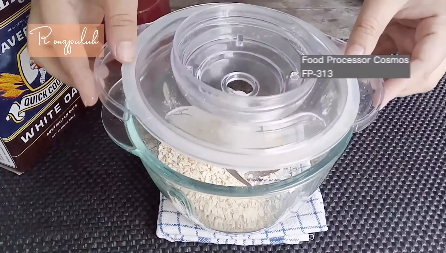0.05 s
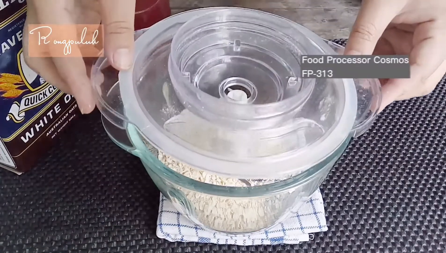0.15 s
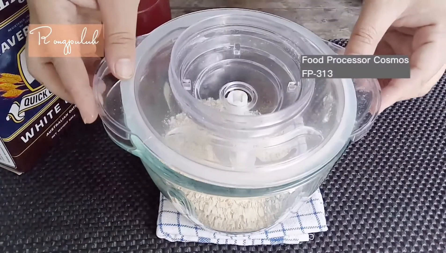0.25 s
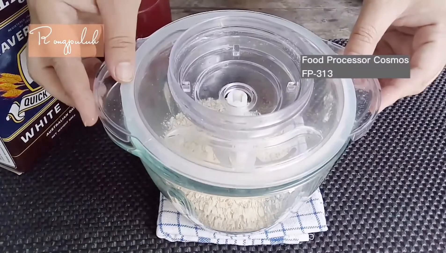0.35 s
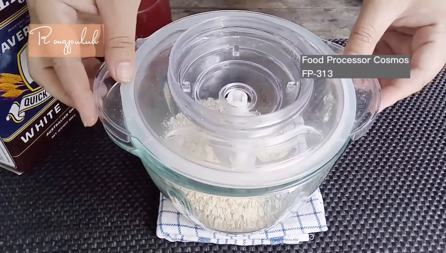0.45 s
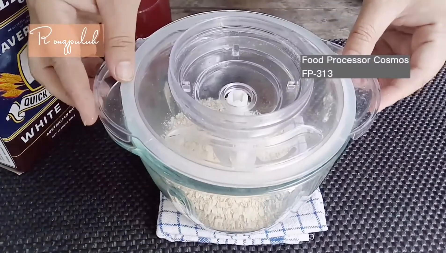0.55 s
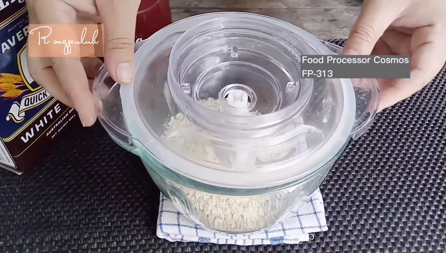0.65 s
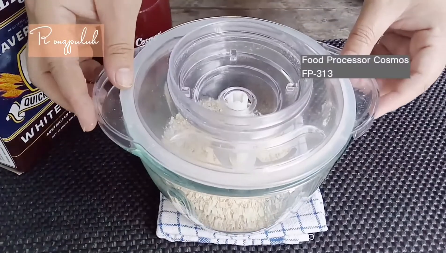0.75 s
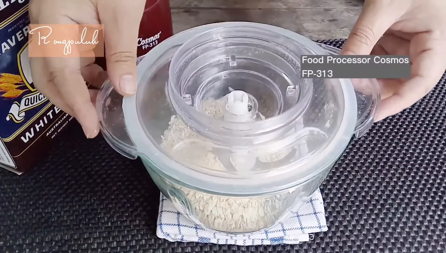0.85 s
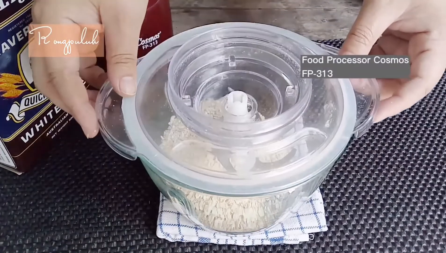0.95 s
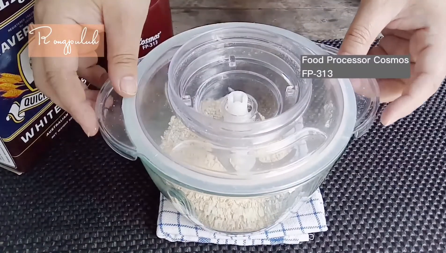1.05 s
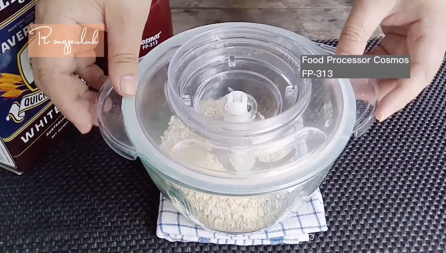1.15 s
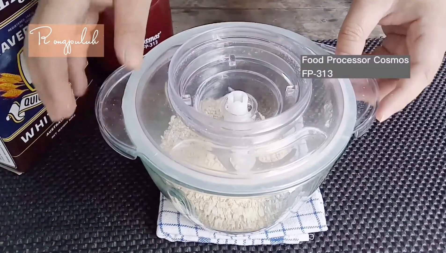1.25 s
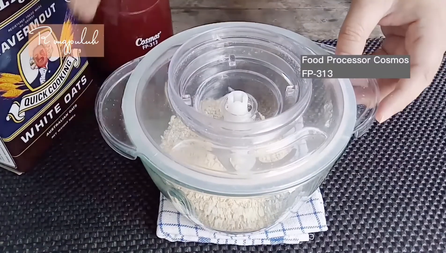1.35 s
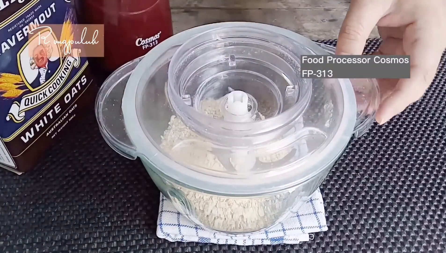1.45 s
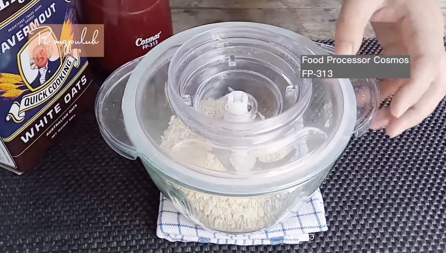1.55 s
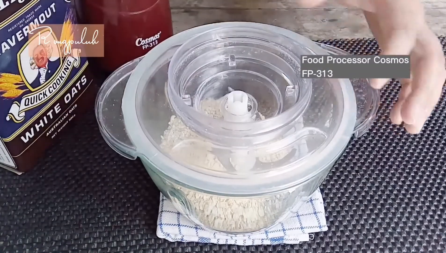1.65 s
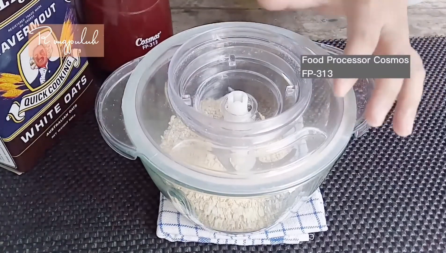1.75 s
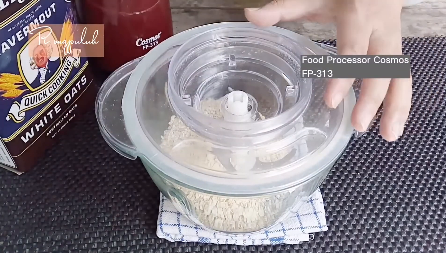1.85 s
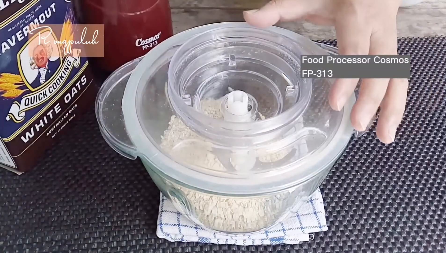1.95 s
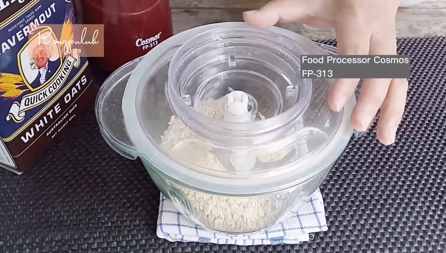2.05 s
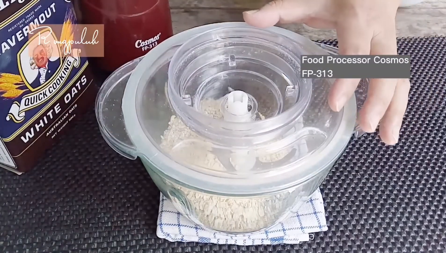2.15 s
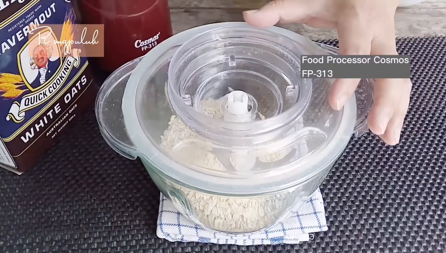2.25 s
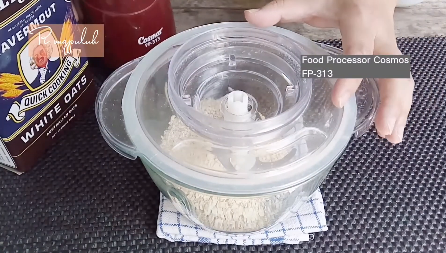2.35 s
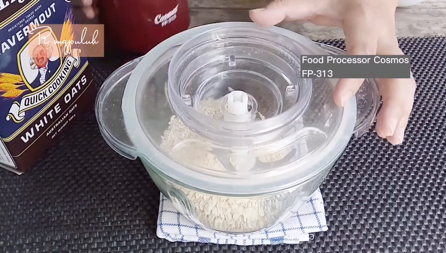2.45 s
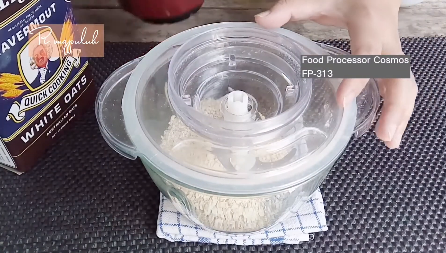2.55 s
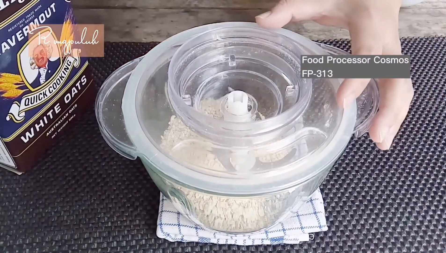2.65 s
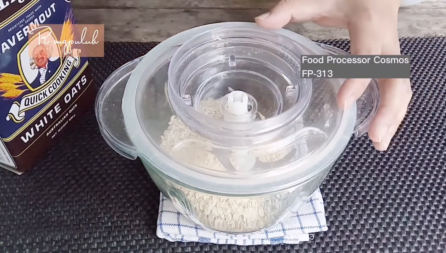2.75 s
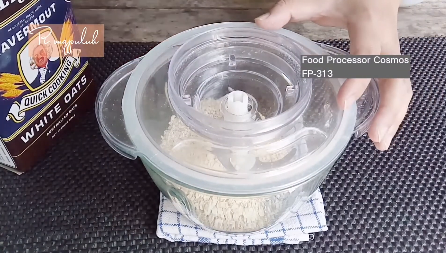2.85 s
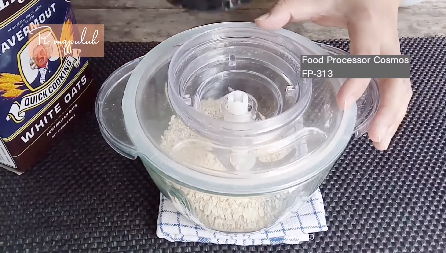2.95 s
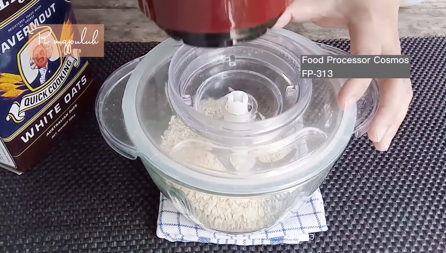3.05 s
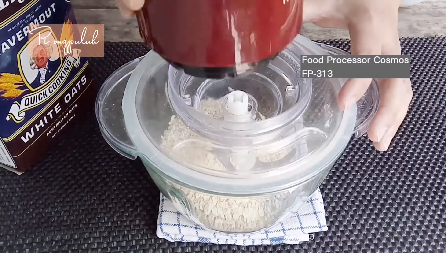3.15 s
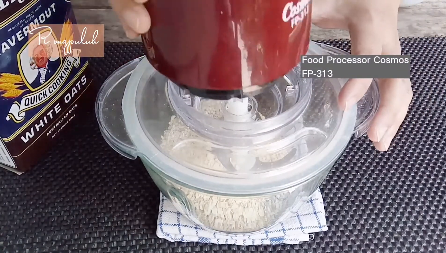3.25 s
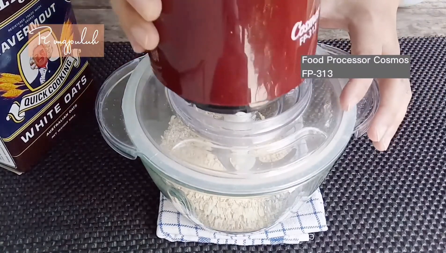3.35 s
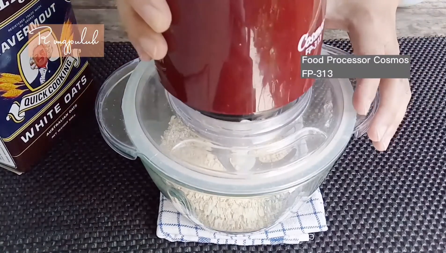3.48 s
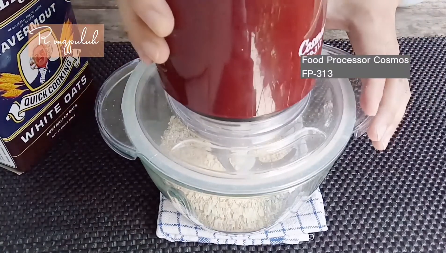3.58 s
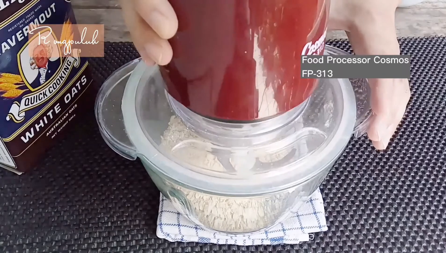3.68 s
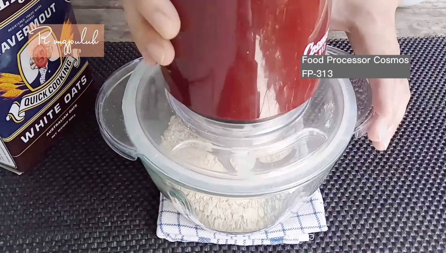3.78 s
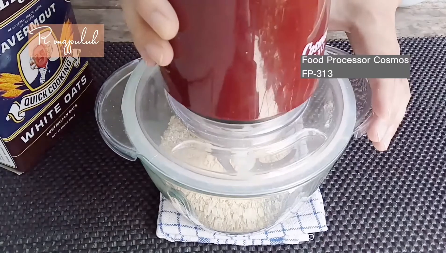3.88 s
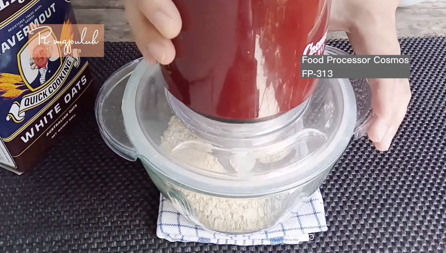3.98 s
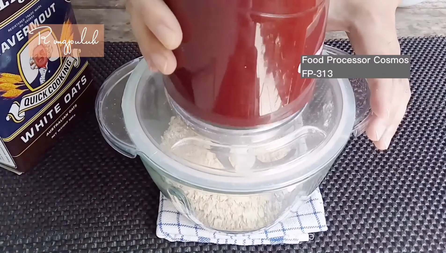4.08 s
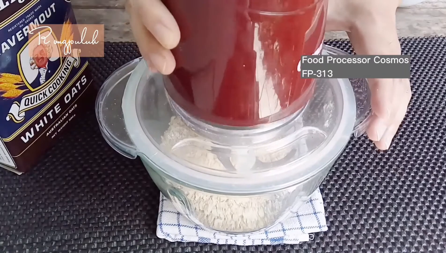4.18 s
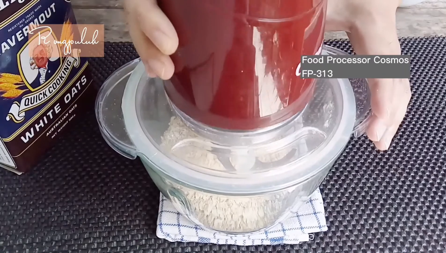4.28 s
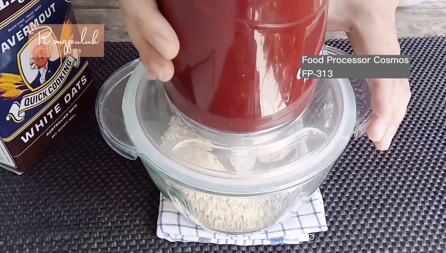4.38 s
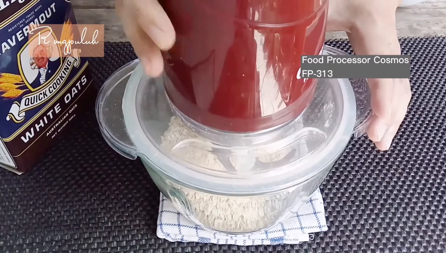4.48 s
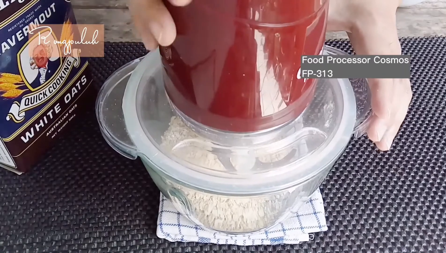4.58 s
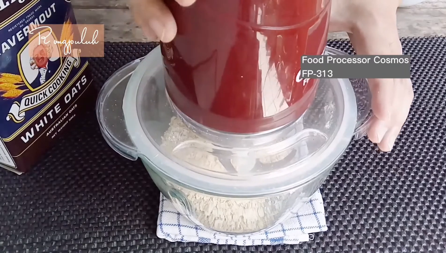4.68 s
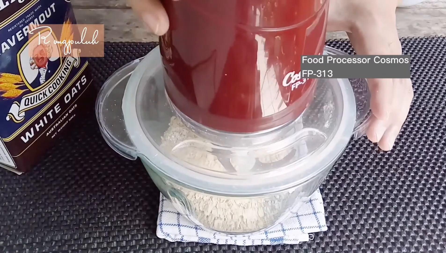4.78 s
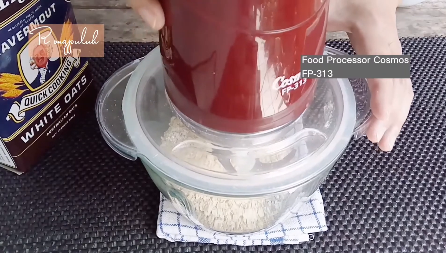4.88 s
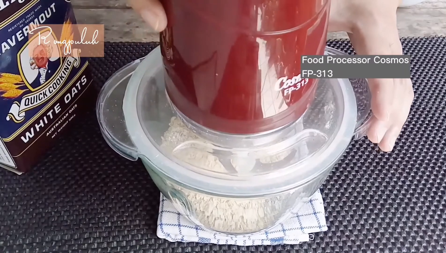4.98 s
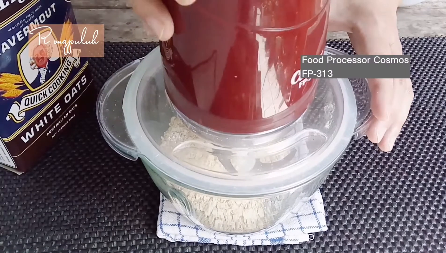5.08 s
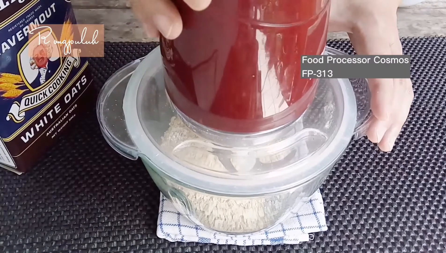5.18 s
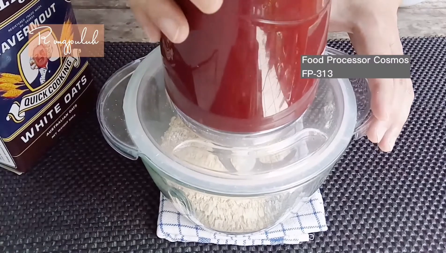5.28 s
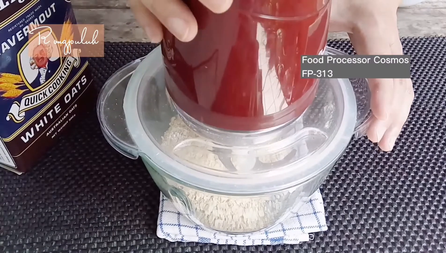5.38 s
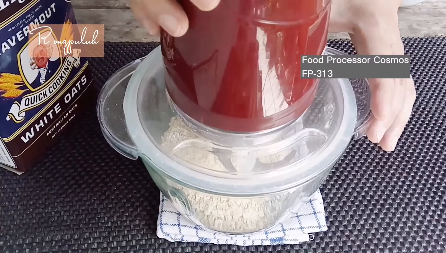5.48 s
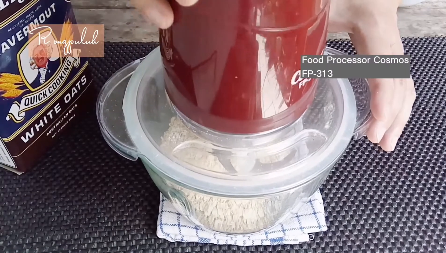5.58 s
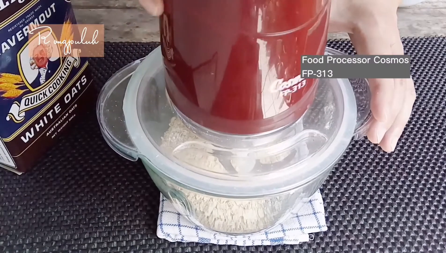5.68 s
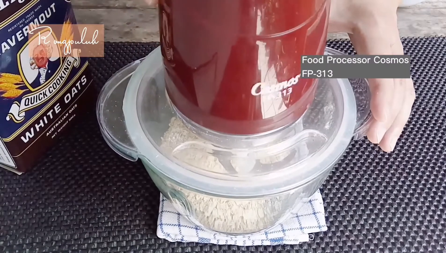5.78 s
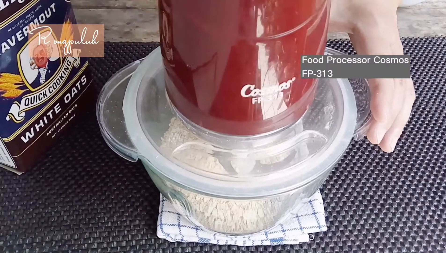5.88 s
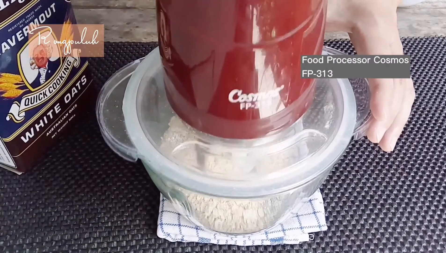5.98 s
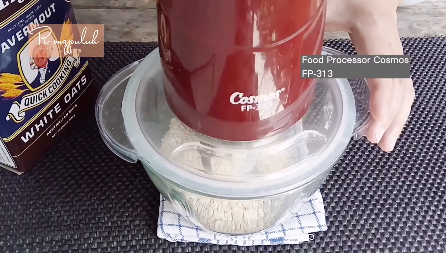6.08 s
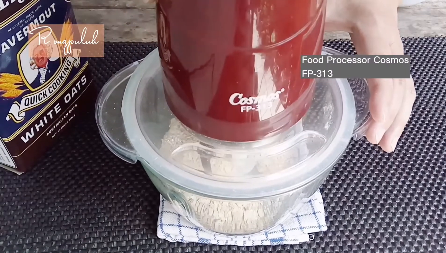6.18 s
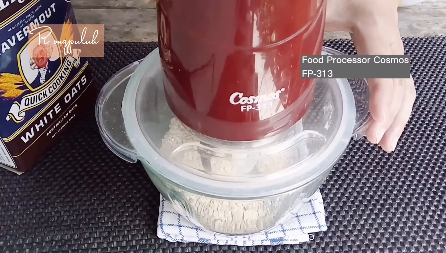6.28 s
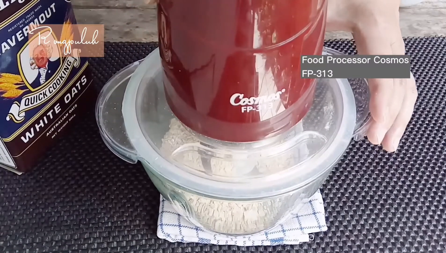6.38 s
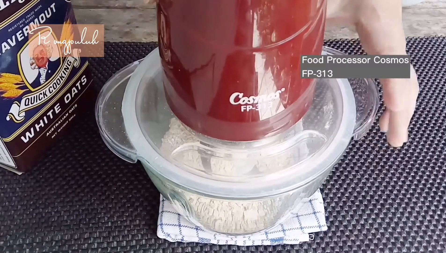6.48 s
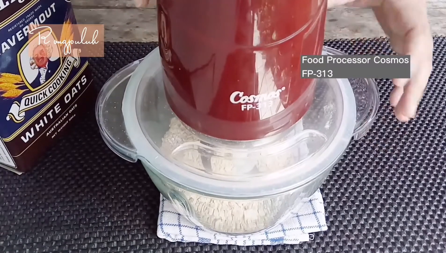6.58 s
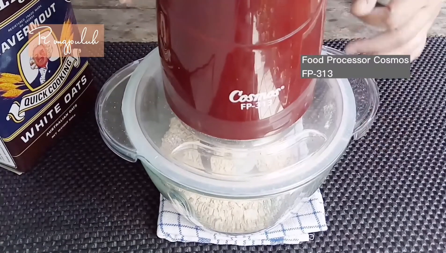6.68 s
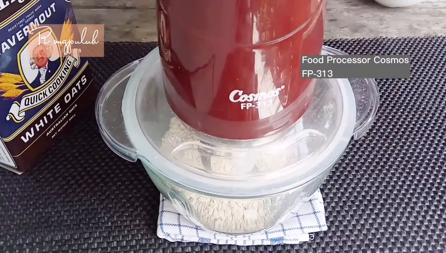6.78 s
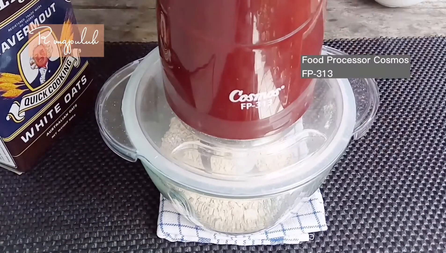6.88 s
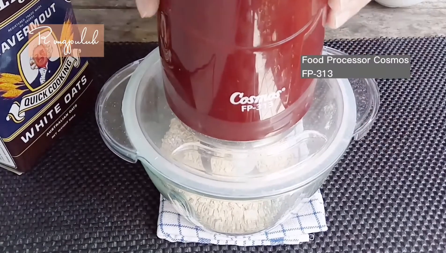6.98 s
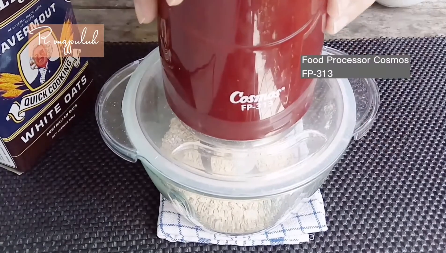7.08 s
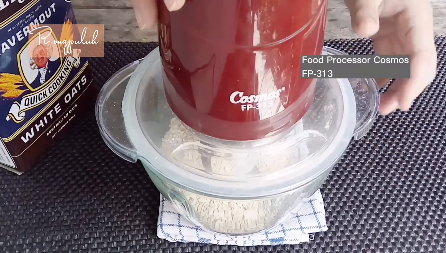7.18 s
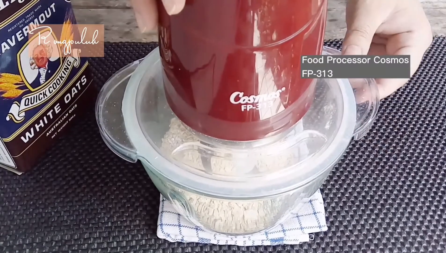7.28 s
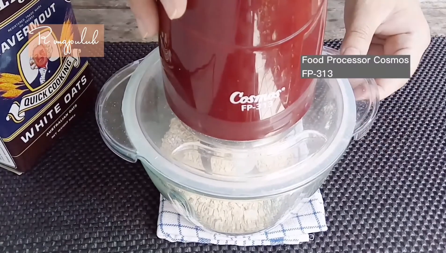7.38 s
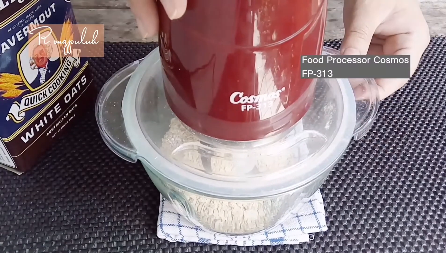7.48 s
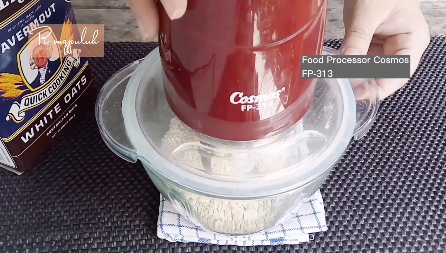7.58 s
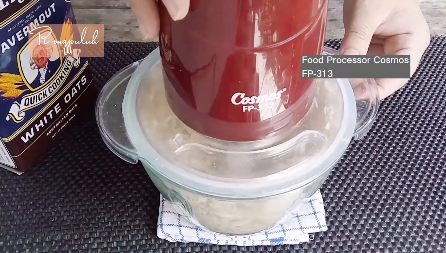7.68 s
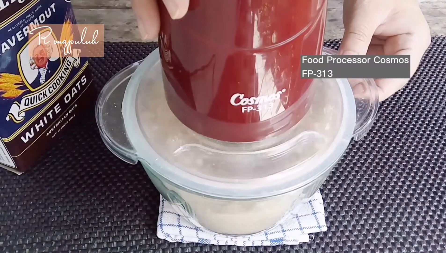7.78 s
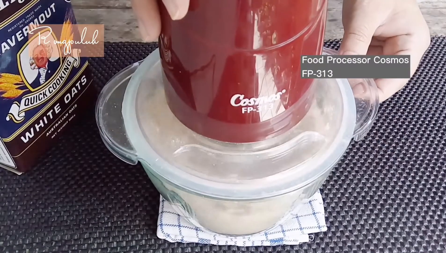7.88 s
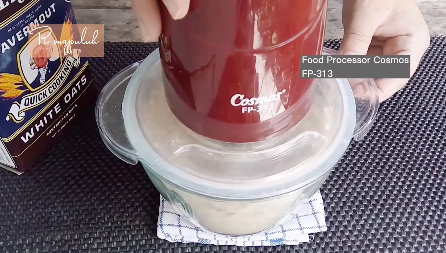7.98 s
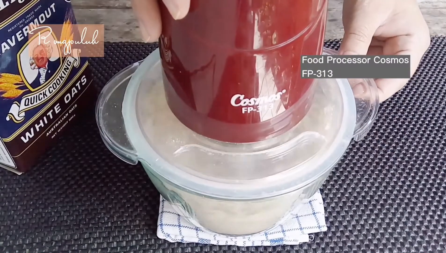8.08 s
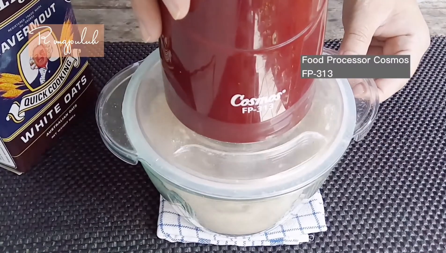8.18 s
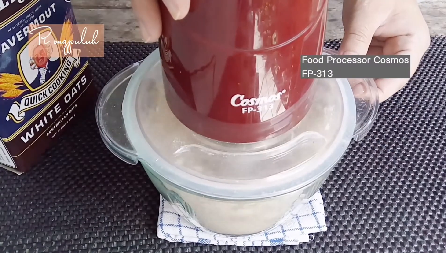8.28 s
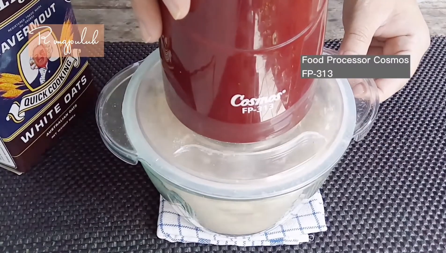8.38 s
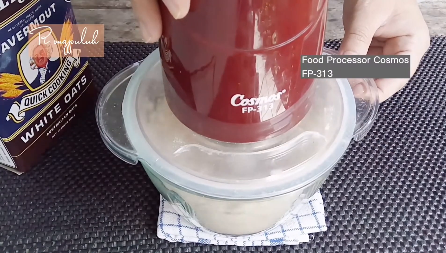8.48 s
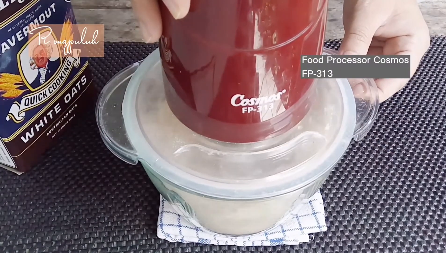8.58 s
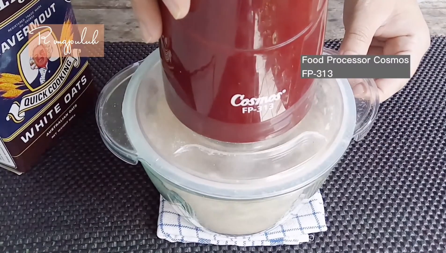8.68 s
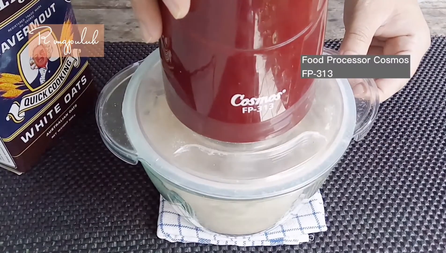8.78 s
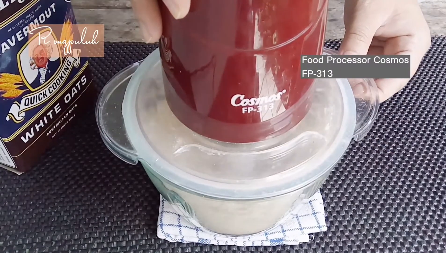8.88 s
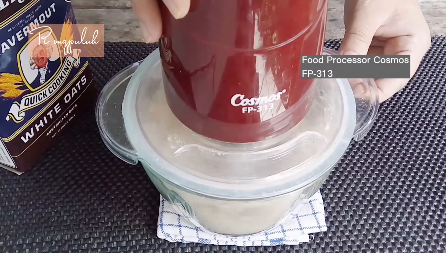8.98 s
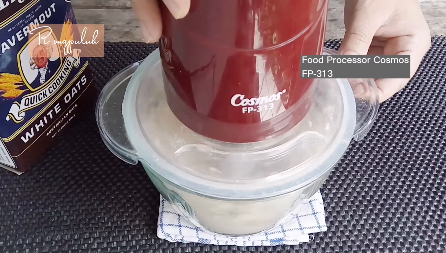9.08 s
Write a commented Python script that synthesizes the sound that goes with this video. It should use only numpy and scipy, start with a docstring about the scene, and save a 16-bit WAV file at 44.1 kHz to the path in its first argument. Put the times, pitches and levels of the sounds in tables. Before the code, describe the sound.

Close kitchen handling with sparse taps, thuds and small squeaks, a brief dropout, rumbling grips, then a food processor roars up and whines.

```python
"""A geared motor head, seated with its plastic lid on a glass bowl of oats, runs up and grinds them.
Place: a light table in a quiet kitchen. Before the grind come clicks, thuds, squeaks and faint hums, a short
dropout, then hands pressing on the machine. Blows are ringing modes and noise bursts, the rest filtered
noise and wavering tones; the motor adds shaft tones, gear whine and rattling oats.
Two spaced microphone ports, close by; the machine sits a little to the left."""
import sys
import numpy as np
from scipy import signal
from scipy.fft import rfft, irfft
from scipy.io import wavfile
from scipy.ndimage import uniform_filter1d

SR = 44100
rng = np.random.default_rng(int(sys.argv[2]) if len(sys.argv) > 2 else 0)


def dump_mix(stems):
    """Bounce the given channels to the path in sys.argv[1] as a 16-bit WAV at rate SR."""
    frames = np.atleast_2d(stems).T  # one column per channel
    limited = np.clip(frames, -1, 1)  # hard clip at full scale
    pcm = np.round(limited * 32767).astype(np.int16)
    wavfile.write(sys.argv[1], SR, pcm)


def nominal_scale(level):
    """Amplitude ratio for a level in decibels (scalar or array-like)."""
    x = np.asarray(level, float) / 20
    return 10 ** x


N = 403074
T = np.arange(N) / SR
HZ = np.arange(N // 2 + 1) * SR / N + 1  # 1 Hz up, so that its logarithm exists
PORTS = np.array([[1], [-1]])  # sign of a level or phase offset at the left and right port


def read(points, hz=HZ):
    """A spectrum table on a log-frequency axis."""
    f, v = np.transpose(points)
    return np.interp(np.log(hz), np.log(f), v)


def curves(rows):
    """Every column of a time table, sample by sample."""
    s, *columns = np.transpose(rows)
    return [np.interp(T, s, c) for c in columns]


def unit(x):
    """Scale to rms 1."""
    return x / np.sqrt(np.mean(x ** 2))


def peak(hz, width):
    """Complex response of one resonance, 1 at its centre."""
    return 1 / (1 + 1j * (HZ ** 2 - hz ** 2) / (HZ * width))


# how alike the two spaced ports hear noise: (frequency [Hz], correlation [-1 to 1])
PORT_LIKENESS = [(130, 1), (290, 0.682), (640, 0.18), (1400, -0.16), (3000, -0.05)]
# port balance of close and of room sounds: (frequency [Hz], left minus right [dB])
NEAR_BALANCE = [(200, 12), (700, -3), (1300, 3.5), (2400, 4.5), (4400, 5), (8000, 8.5), (15000, -3)]
ROOM_BALANCE = [(200, 2), (700, -0.5), (8000, 3.5), (15000, -2)]


def noise(gain, balance, grains=1):
    """Two-port noise of rms 1 through a gain per frequency: alike in the bass, nearly unrelated above."""
    mid, side = rfft(rng.standard_normal((2, N)) * grains)
    alike = np.clip(read(PORT_LIKENESS), -1, 1)
    pan = nominal_scale(read(balance) / 2)
    mid, side = mid * np.sqrt(1 + alike), side * np.sqrt(1 - alike)
    ports = np.array([(mid + side) * pan, (mid - side) / pan])
    return unit(irfft(gain * ports, N))


def walk(rate, channels=1, size=N):
    """Random levels held 1 / rate s and slewed twice; rms 1."""
    k = int(SR / rate)
    steps = np.repeat(rng.standard_normal((channels, size // k + 1)), k, axis=1)
    slewed = uniform_filter1d(uniform_filter1d(steps, k), k)
    return unit(slewed[:, :size])


def ring(modes, push_s, t, sign=1):
    """Decaying modes after a push that takes push_s to build; sign -1 lets neighbours swing oppositely."""
    out = 0
    for k, (hz, db, t60) in enumerate(modes):
        out = out + sign ** k * nominal_scale(db) * np.sin(2 * np.pi * hz * t) * 1000 ** (-t / t60)
    return out * (1 - np.exp(-t / push_s))


def add(out, s, sound):
    """Mix a sound in at time s."""
    i = int(s * SR)
    out[:, i:i + sound.shape[-1]] += sound[..., :N - i]


# spectrum of the kitchen: (frequency [Hz], relative level per Hz [dB])
ROOM_SPECTRUM = [(25, -3.5), (50, -24), (113, -8.5), (160, -5.5), (200, -12.5), (330, -20), (540, -19.5),
                 (1300, -25.5), (2700, -29), (5500, -30), (8200, -38.5), (10000, -33), (13800, -43.5),
                 (15500, -68)]
# room tone over time, before band split and waver: (time [s], rumble level [dB], hiss level [dB])
ROOM_LEVELS = [(0, -47.5, -51.5), (.44, -42.5, -52), (1.3, -47, -53.5), (2.5, -45, -51.5),
               (3.3, -44.5, -52.5), (4.6, -41.5, -51), (5.6, -42, -48.5), (6.05, -41.5, -48),
               (6.83, -44.5, -51.5)]


def room():
    """Low rumble and smooth hiss, parted around 700 Hz, each wavering in level."""
    rumble_db, hiss_db = curves(ROOM_LEVELS)
    low = 1 / (1 + (HZ / 700) ** 4)
    tone = nominal_scale(read(ROOM_SPECTRUM))
    rumble = nominal_scale(rumble_db + 1.27 * walk(8)) * noise(tone * np.sqrt(low), ROOM_BALANCE)
    hiss = nominal_scale(hiss_db + 0.98 * walk(12)) * noise(tone * np.sqrt(1 - low), ROOM_BALANCE)
    return rumble + hiss


# modes of the bare lid on the glass: (frequency [Hz], level [dB], 60 dB decay [s])
BARE_LID = [(368, -0.5, 0.048), (517, -0.5, 0.059), (862, -8.5, 0.038), (1100, 1, 0.0097), (1565, 0, 0.043),
            (2180, -8, 0.043)]
# modes of the lid with the motor head on it: (frequency [Hz], level [dB], 60 dB decay [s])
LID_WITH_HEAD = [(317, 1.5, 0.052), (436, -0.5, 0.033), (546, -2.5, 0.055), (717.2, -5.5, 0.036),
                 (867, -6.5, 0.045), (1100.2, -5, 0.051), (1246, -9, 0.025), (1697, -1.5, 0.028),
                 (2370, -32, 0.036)]


def lid_ring(s, crack_db, lid_db, centre_hz, t):
    """Where and how hard the lid is struck picks the modes that ring; a sharper blow wakes more of them."""
    head_on_s = 3.3
    # 1.01 octaves of spread, plus 0.032 octaves per dB of crack over ring
    octaves = np.clip(1.01 + 0.032 * (crack_db - lid_db), .25, 1.3)
    struck = []
    for hz, db, t60 in BARE_LID if s < head_on_s else LID_WITH_HEAD:
        away = np.log2(hz / centre_hz) / octaves
        struck.append((hz, db - 6 * away ** 2, t60))
    lid = nominal_scale(lid_db) * ring(struck, 0.0003, t, -0.99)
    return np.array([nominal_scale(3.5) * lid, np.roll(lid, 8)])  # louder at the left port, later at the right


# blows before shaping: (time [s], crack level [dB], table thud level [dB], lid ring level [dB],
# centre of the struck lid modes [Hz])
BLOWS = [(.3030, -35.5, -42, -26, 1090), (0.332, -28.5, -50.5, -37, 1600), (0.3476, -31, -44, -30.5, 1000),
         (.3530, -46, -42, -23.5, 520), (0.397, -32, -48, -30, 623), (0.5222, -17.5, -54, -30.5, 387),
         (.5560, -56, -44, -32, 329), (.9000, -56, -49.5, -28, 350), (1.0737, -52.5, -41.5, -30, 1060),
         (1.0822, -48.5, -23, -51, 350), (1.427, -32, -52, -38, 1310), (2.7990, -42, -33.5, -40, 400),
         (3.6542, -40, -26.5, -42, 450), (3.758, -33.5, -24, -28.5, 418), (3.8920, -53.5, -21, -31.5, 350),
         (3.9185, -32, -23.5, -28, 885), (4.2410, -32, -31, -37, 450), (4.2550, -27.5, -19.5, -35, 2300),
         (4.2812, -10, -9.5, -16, 450), (4.2851, -13, -24, -18, 900), (4.2990, -33, -40, -26, 1000),
         (4.3436, -38, -27, -40, 400), (4.5210, -38, -28.5, -31, 584), (4.538, -27.5, -29, -29.5, 487),
         (5.2120, -33.5, -34.5, -39, 600), (6.1815, -13, -14, -27.5, 400), (6.1905, -23.5, -9, -22.5, 400),
         (6.2003, -2, -36, -21, 500), (6.208, -10, -24, -16, 1200), (6.2157, -5, -14.5, -8.5, 1270),
         (6.2205, -37, -8, -22, 400), (7.819, -15.5, -31.5, -31, 1200), (7.838, -15, -29, -32, 1200)]
# close table modes that beat: (frequency [Hz], level [dB], 60 dB decay [s])
TABLE_MODES = [(130, -4, 0.2), (168, 4, 0.1), (205, -3, 0.06)]
# colour of the crack: (frequency [Hz], width [Hz], level [dB])
CRACK_COLOUR = [(1200, 800, 8), (2920, 1100, -2), (4600, 1700, -5), (6000, 900, -12), (9340, 840, -6.5)]


def knocks():
    """Each blow is a short crack, a ring of the lid, a dull rattle and a thud of the table top."""
    out, cracks, rattles = np.zeros((3, 2, N))
    t = T[:SR // 4]
    rattle_db, rattle_s = -16, 0.024  # bowl and oats rattle on: level against the ring, decay
    for s, crack_db, thud_db, lid_db, centre_hz in BLOWS:
        add(out, s, nominal_scale(thud_db + 1.3 * PORTS) * ring(TABLE_MODES, 0.0025, t))
        add(out, s, lid_ring(s, crack_db, lid_db, centre_hz, t))
        # the crack dies in a few ms, with a faint kitchen tail behind it
        decay = np.exp(-t / 0.0024) + nominal_scale(-23.0) * np.exp(-t / 0.0148)
        add(cracks, s, nominal_scale(crack_db) * decay * (1 - np.exp(-t / 0.00077)))
        rattle = np.exp(-t / rattle_s) * (1 - np.exp(-t / 0.003))
        add(rattles, s, nominal_scale(lid_db + rattle_db) * rattle)
    out += rattles * noise(peak(650, 1000) ** 2, ROOM_BALANCE)
    colour = sum(nominal_scale(db) * peak(hz, width) for hz, width, db in CRACK_COLOUR) * peak(2800, 6200)
    return out + cracks * noise(colour, NEAR_BALANCE)


def add_hiss(out, s, length, hz, width, db):
    """Mix in one band of noise that swells and fades as a bell curve, reaching length s either side of s."""
    t = np.arange(int(2 * length * SR)) / SR - length
    edges = [max(hz - width / 2, 100), min(hz + width / 2, 18000)]
    band = signal.butter(2, edges, "band", fs=SR, output="sos")
    hiss = unit(signal.sosfilt(band, rng.standard_normal((2, len(t)))))
    add(out, max(s - length, 0), nominal_scale(db) * hiss * np.exp(-.5 * (3 * t / length) ** 2))


# short squeaks of plastic: (centre time [s], half length [s], level before the bands [dB])
SQUEAKS = [(1.355, 0.055, -50), (3.535, 0.075, -49)]
# narrow bands the squeaks share: (frequency [Hz], width [Hz], relative level [dB])
SQUEAK_BANDS = [(2100, 160, -6.5), (2505, 260, -1), (3550, 280, -3), (4190, 300, -6.5), (4650, 260, -6),
                (5320, 300, -11)]


def squeaks():
    """Plastic squeaks: noise in several narrow bands at once."""
    out = np.zeros((2, N))
    for s, length, db in SQUEAKS:
        for hz, width, band_db in SQUEAK_BANDS:
            add_hiss(out, s, length, hz, width, db + band_db)
    return out


# modes of the hollow object: (frequency [Hz], level [dB], 60 dB decay [s])
FAR_MODES = [(214.7, 0, 1.6), (365.2, -3.5, 0.91), (478, -9.5, .7), (640, -11, .2), (881, -22, 0.23),
             (1078, -13, 0.28)]


def far_object():
    """A hollow object set down further off: a few low modes ring on."""
    out = np.zeros((2, N))
    add(out, 2.79, nominal_scale(-37.5) * ring(FAR_MODES, 0.00184, T[:SR]))
    return out


# faint hums from outside: (start [s], end [s], start frequency [Hz], end frequency [Hz],
# level before waver and swell [dB], octave level against the fundamental [dB])
HUMS = [(2.946, 3.623, 306.6, 311, -55, -6.5), (5.387, 5.75, 316.6, 383, -51.5, -11)]


def hums():
    """Wavering low tones with their octave, gliding upward."""
    out = np.zeros((2, N))
    for start, end, hz0, hz1, db, octave_db in HUMS:
        u = np.linspace(0, 1, int((end - start) * SR))
        phase = 2 * np.pi * np.cumsum(hz0 + (hz1 - hz0) * u) / SR
        waver = nominal_scale(db + 3.2 * walk(17.7, size=len(u))) * np.sin(np.pi * u) ** .5
        add(out, start, waver * (np.sin(phase) + nominal_scale(octave_db) * np.sin(2 * phase)))
    return out


# skin and plastic rubbing: (centre time [s], half length [s], frequency [Hz], width [Hz],
# level before the swell [dB])
RUBS = [(3.446, 0.093, 3950, 1500, -54.5), (3.658, 0.015, 2400, 500, -49),
        (4.677, 0.028, 8100, 6000, -46.5), (5.859, 0.23, 6000, 1500, -53), (6.18, 0.016, 3960, 7100, -29),
        (6.289, 0.042, 4226, 1200, -49), (6.64, 0.11, 4900, 1300, -52)]


def rubs():
    """Skin and plastic rubbing: short hisses, each in one band."""
    out = np.zeros((2, N))
    for row in RUBS:
        add_hiss(out, *row)
    return out


def thin_squeak():
    """A thin whistling squeak: one trembling tone that sinks and trails off."""
    out = np.zeros((2, N))
    t = T[:SR // 3]
    start_hz, end_hz, attack_s, release_s = 5350, 5150, 0.04, 0.08
    hz = end_hz + (start_hz - end_hz) * np.exp(-t / 0.08) + 130 * walk(500, size=len(t))
    shape = (1 - np.exp(-(t / attack_s) ** 2)) * np.exp(-t / release_s)
    level = nominal_scale(-43 + 4.5 * walk(70, channels=2, size=len(t)))  # flickers apart at each port
    add(out, 6.565, level * shape * np.sin(2 * np.pi * np.cumsum(hz) / SR))
    return out


# modes of the loaded table: (frequency [Hz], width [Hz], relative level [dB])
LOADED_TABLE = [(141.45, 15.8, 8.5), (250, 19, -30), (411, 44, -13), (500, 19, -16)]


def table_shake():
    """Unsteady force on the loaded table, mostly its lowest mode."""
    modes = sum(nominal_scale(db) * peak(hz, width) for hz, width, db in LOADED_TABLE)
    body = modes * peak(184, 224) * HZ / (HZ + 300)
    return nominal_scale(1.3 * walk(40)) * noise(body, ROOM_BALANCE)


# hands shifting their grip: (start [s], attack and hold [s], table rumble level [dB],
# cloth and skin rustle level [dB])
GRIPS = [(6.893, 0.017, -36, -56), (6.935, 0.021, -30, -43), (7.016, 0.056, -34.5, -52),
         (7.101, 0.031, -34, -53), (7.171, 0.049, -32.5, -45), (7.253, 0.06, -35, -51),
         (7.329, 0.0788, -34.5, -44.5), (7.476, 0.092, -32.5, -46), (7.589, 0.051, -29, -42.5),
         (7.661, 0.075, -32.5, -46), (7.736, 0.069, -32.5, -42)]
# spectrum of cloth and skin before a broad resonance: (frequency [Hz], relative level per Hz [dB])
RUSTLE_SPECTRUM = [(600, -27), (1320, -9.5), (3470, -10), (8180, -15.5), (11300, -8.5), (15000, -19)]


def hands():
    """Each shift of grip shakes the table while skin and cloth rustle."""
    rumble, rustle = np.zeros((2, N))
    attack_s, release_s = 0.009, 0.027
    for s, hold, rumble_db, rustle_db in GRIPS:
        grip = np.clip((T - s) / attack_s, 0, 1) * np.exp(-np.clip(T - s - hold, 0, 1) / release_s)
        # overlapping grips add in power
        rumble = np.hypot(rumble, nominal_scale(rumble_db) * grip)
        rustle = np.hypot(rustle, nominal_scale(rustle_db) * grip)
    skin = nominal_scale(1.0 * walk(83)) * noise(nominal_scale(read(RUSTLE_SPECTRUM)) * peak(4200, 20000), ROOM_BALANCE)
    return rumble * table_shake() + rustle * skin


START_S = 7.81  # the motor starts
BLADE_SHARE, SUN_TEETH = .144, 10  # planetary gear: blade turns per shaft turn, teeth of the sun wheel


def run_up(t):
    """Shaft speed in Hz: it leaps to most of its speed, then creeps on as the load eases."""
    since = t - START_S
    return 370.4 - 195 * np.exp(-since / .046) - 56.87 * np.exp(-since / .68)


# coarseness of the oats as they turn to flour: (time [s], level [dB])
COARSENESS = [(7.81, -0.5), (8.15, 0), (8.4, -2.5), (8.68, -3), (8.8, -8.5), (9.14, -14.5)]


def grown(layer, t):
    """Amplitude level of a motor layer: it settles in the run-up, drifts, and follows the oats' coarseness."""
    run_db, lower_db, half_s, growth_s, drift_db, follow = layer
    coarse_db = np.interp(t, *np.transpose(COARSENESS))
    settled_db = run_db - lower_db / (1 + np.exp((t - half_s) / growth_s))
    return settled_db + drift_db * (t - START_S) + follow * coarse_db


def order_tones(orders, turn, flicker_db, rate, lead):
    """Sines at multiples of the shaft turn, flickering in level; lead [rad] parts the ports in phase."""
    out = 0
    for k, db in orders:
        flicker = nominal_scale(db + flicker_db * walk(rate, size=len(turn)))
        out = out + flicker * np.sin(k * turn + lead * k * PORTS)
    return np.sqrt(2) * out


# All motor layers share these columns: (level before drift and coarseness [dB], start below that by [dB],
# half-way time [s], growth time [s], drift [dB/s], follows coarseness by [dB/dB])
SHAFT_LAYER = (-24.5, 13, 7.935, .015, .5, 0)
# shaft tones: (multiple of shaft speed, relative level [dB])
SHAFT_ORDERS = [(1, 0.5), (2, -17)]


def shaft_tones(turn, t):
    """The clean tone of the turning shaft and its faint octave."""
    level = nominal_scale(grown(SHAFT_LAYER, t) + 2.5 * PORTS)
    return level * order_tones(SHAFT_ORDERS, turn, 1.53, 29.98, 0.24)


# level of the load tone, columns as for the shaft layer
LOAD_LAYER = (-27.5, 25, 7.945, .01, 0, 2.2)
# load tone: (multiple of shaft speed, relative level [dB])
LOAD_ORDERS = [(1.29, -1.5)]


def load_tones(turn, t):
    """A second low tone that fades as the oats turn to flour."""
    level = nominal_scale(grown(LOAD_LAYER, t) + 1.2 * PORTS)
    return level * order_tones(LOAD_ORDERS, turn, 1.8, 30.17, 0.22)


def teeth(mesh, blade, order, rate):
    """Tooth contact: a line and one two blade turns above, jittering apart per port; both throb per blade turn."""
    out, size = 0, len(mesh)
    for blades, db in ((0, -1), (2, 0)):
        jitter = .35 * np.sin(blade) + .75 * walk(rate, channels=2, size=size)
        flicker = nominal_scale(db + 3.5 * walk(rate / 2, channels=2, size=size))
        out = out + flicker * np.sin(order * (mesh + jitter) + blades * blade)
    throb = nominal_scale(3 * np.cos(blade + .8 * walk(12, size=size)))
    return unit(out * throb)


# levels of the gear whine and of its octave before the housing, columns as for the shaft layer
MESH_LAYER = (-23.5, 17, 7.89, .028, -4.5, 0)
MESH_OCTAVE_LAYER = (-24.5, 14, 7.88, .025, 1.5, 0)
# housing resonances that lift the octave as it passes: (frequency [Hz], width [Hz], gain [dB])
HOUSING = [(5340, 484, -5), (6260, 720, 0.5)]


def gear_whine(turn, hz, t):
    """Rough whine of the meshing teeth; its octave swells on passing the housing resonances."""
    mesh_ratio = SUN_TEETH * (1 - BLADE_SHARE)
    blade, mesh = BLADE_SHARE * turn, mesh_ratio * turn
    whine = nominal_scale(grown(MESH_LAYER, t) + 1.3 * PORTS) * teeth(mesh, blade, order=1, rate=90)
    octave_hz = 2 * mesh_ratio * hz
    lift = sum(nominal_scale(db) / (1 + (2 * (octave_hz - f) / w) ** 2) for f, w, db in HOUSING)
    octave_level = nominal_scale(grown(MESH_OCTAVE_LAYER, t) + 4.3 * PORTS) * lift
    return whine + octave_level * teeth(mesh, blade, order=2, rate=260)


# level of the grinding, columns as for the shaft layer
GRINDING_LAYER = (-17.5, 5.5, 7.89, .05, 0, 0)
# spectrum of the ground oats: (frequency [Hz], relative level per Hz [dB])
GRIND_SPECTRUM = [(60, -19), (450, -5), (890, -11), (1230, -4), (2200, -9), (3000, -4.5), (6000, -4),
                  (8200, -11), (9900, -11.5), (14000, -16.5), (15200, -40)]
# bowl resonances, squared when used: (frequency [Hz], width [Hz], relative level [dB])
BOWL = [(1212, 360, -5), (3311.5, 82, -15), (5100, 500, -10), (5550, 350, -6.5), (6400, 460, -4.5),
        (10150, 2230, -19.5)]


def grinding(start, t):
    """Oats rattling in the bowl: grainy noise coloured by the bowl's resonances."""
    colour = nominal_scale(read(GRIND_SPECTRUM)) + sum(nominal_scale(db) * peak(f, w) ** 2 for f, w, db in BOWL)
    rattle = noise(colour, NEAR_BALANCE, nominal_scale(1.1 * walk(700)))
    return nominal_scale(grown(GRINDING_LAYER, t)) * rattle[:, start:]


# modes of the coupling: (frequency [Hz], level [dB], 60 dB decay [s])
CLUNK_MODES = [(1130, -11, 0.022), (1400, -16, 0.018)]


def clunk():
    """The coupling takes hold: two short modes."""
    return nominal_scale(1.5 * PORTS) * ring(CLUNK_MODES, 0.0018, T[:SR // 4])


def whistle(t):
    """A thin tone that wakes in the run-up and fades."""
    peak_s, rise_s, fade_s, hz = 8.02, 0.025, 0.16, 3300
    shape = np.exp(np.minimum((t - peak_s) / rise_s, (peak_s - t) / fade_s))
    level = nominal_scale(-30 + 1.3 * PORTS + 2.5 * walk(60, size=len(t)))
    return level * shape * np.sin(2 * np.pi * hz * t + walk(120, size=len(t)))


# level of the table shaking under the motor, columns as for the shaft layer
SHAKE_LAYER = (-32, -4, 7.85, .01, 0, .9)


def motor():
    """One shaft speed drives the tones and gear whine; oats, table, coupling and a whistle join in."""
    start = int(START_S * SR)
    t = T[start:]
    hz = run_up(t)
    turn = 2 * np.pi * np.cumsum(hz) / SR
    running = shaft_tones(turn, t) + load_tones(turn, t) + gear_whine(turn, hz, t)
    running = running + grinding(start, t) + whistle(t)
    running = running + nominal_scale(grown(SHAKE_LAYER, t)) * table_shake()[:, start:]
    out = np.zeros((2, N))
    out[:, start:] = running * np.clip(T[:len(t)] / 0.0093, 0, 1)  # opens over 9.3 ms
    add(out, 7.817, clunk())
    return out


def scene():
    """All sources together."""
    handling = knocks() + squeaks() + far_object() + rubs() + thin_squeak() + hands()
    return room() + handling + hums() + motor()


def roll_off(x):
    """The treble ends steeply here."""
    return signal.sosfilt(signal.butter(12, 15850, fs=SR, output="sos"), x)


def record(dry):
    """The microphone cuts deep bass; the sound drops out for a moment and fades back; loud peaks are rounded."""
    dropout_s, return_s, fade_s = 6.839, 6.885, 0.014
    on = np.maximum(T < dropout_s, np.clip((T - return_s) / fade_s, 0, 1) ** 2)
    high_pass = signal.butter(3, 74.3, "high", fs=SR, output="sos")
    deep_bass = dry - signal.sosfilt(high_pass, dry)
    heard = dry - 0.89 * deep_bass  # a shelf: a share of the deep bass still passes
    finished = np.tanh(1.16 * heard * on) / 1.082
    return roll_off(finished)


dry = scene()
out = record(dry)
dump_mix(out)
```